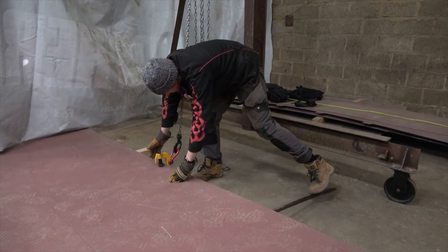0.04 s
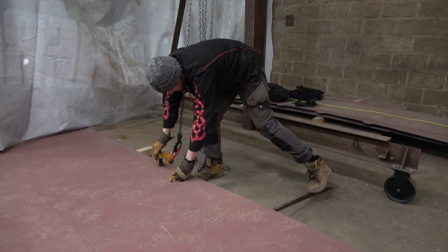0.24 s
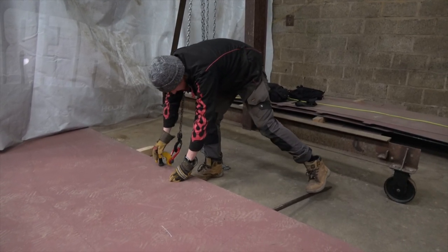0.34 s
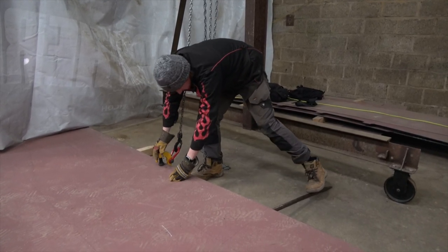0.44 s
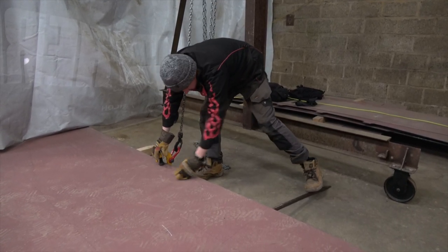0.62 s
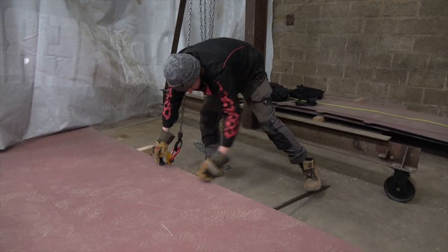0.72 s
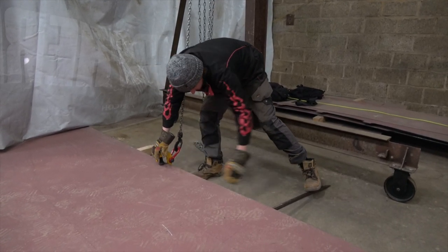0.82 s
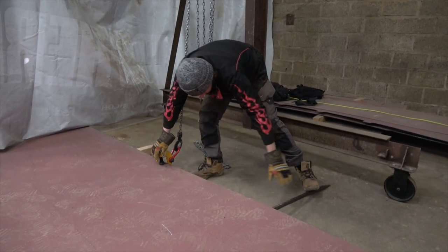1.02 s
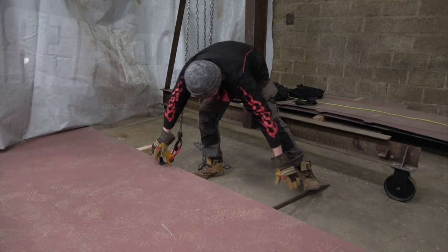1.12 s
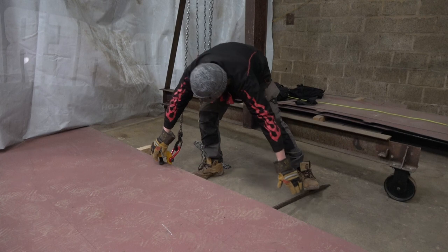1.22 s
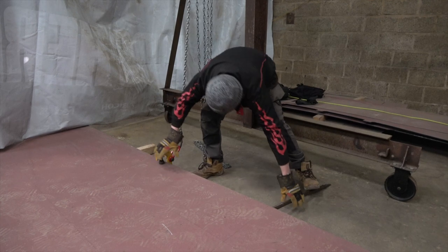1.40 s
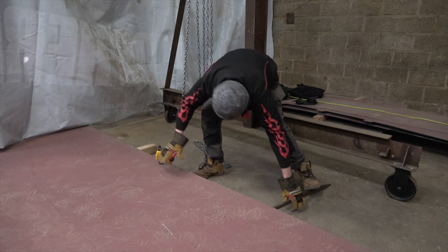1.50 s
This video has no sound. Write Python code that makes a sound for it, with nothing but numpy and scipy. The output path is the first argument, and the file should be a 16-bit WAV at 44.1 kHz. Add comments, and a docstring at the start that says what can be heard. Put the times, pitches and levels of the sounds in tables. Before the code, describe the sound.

A small steel piece, still ringing from a knock, slides briefly and clanks down on a big floor plate that booms underneath. A glove drags faintly and boots shuffle on gritty concrete in a reverberant workshop.

```python
"""A small steel piece, still ringing from a knock, slides, touches and clanks down on a big floor plate.
Each contact rings its main modes and stirs dense, short-lived ones; the plate booms under it.
Then a glove drags off the plate and boots shuffle and step on gritty concrete, with a few light taps.
A block-walled workshop reverberates, over quiet air noise."""
import sys
import numpy as np
from scipy import signal
from scipy.fft import rfft, irfft, next_fast_len
from scipy.io import wavfile
from scipy.ndimage import uniform_filter1d

SR = 44100
rng = np.random.default_rng(int(sys.argv[2]) if len(sys.argv) > 2 else 0)


def master(y):
    """Save y as 16-bit WAV."""
    cut = np.clip(np.atleast_2d(y).T, -1, 1)
    pcm = np.round(cut * 32767)  # scale
    wavfile.write(sys.argv[1], SR, pcm.astype(np.int16))


N = 68355
LEAD_S = .1

# Spectra. Each row: frequency in Hz, relative density in dB.
AIR_SPECTRUM = [(25, 6), (45, 1.5), (80, -4.5), (200, -6), (400, -7), (750, -10), (1300, -14.5),
                (2200, -18), (3400, -10), (4500, -22), (15500, -25)]
SOLE_SPECTRUM = [(50, -25.5), (110, -5), (200, 0.5), (450, -1), (900, -3.5), (2200, -4.5), (4500, -10),
                 (9000, -12.5), (15500, -17.5)]
GLOVE_SPECTRUM = [(200, -20.5), (600, -14.5), (1100, -5.5), (2000, -2), (2900, 6), (4200, -9),
                  (10000, -32.5)]
PLATE_SPECTRUM = [(40, -46), (75, -24), (112, 0), (200, 2.5), (330, -1.5), (450, -10), (560, -15.5),
                  (640, -5), (760, -14), (1000, -19.5), (2000, -42)]
SLIDE_SPECTRUM = [(100, -40), (500, -18), (1200, -18), (1800, -11.5), (2300, -0.5), (2550, -7), (2800, -4),
                  (3900, -2.5), (4500, -13.5), (5400, 3), (6400, -16.5), (7700, -16), (8800, -33),
                  (15000, -43)]
KNOCK_SPECTRUM = [(300, -22), (650, -15.5), (1150, -29.5), (1650, -17.5), (2450, -14.5), (2780, 3.5),
                  (3200, -6.5), (3850, -1), (4150, -10.5), (5300, -10.5), (6000, -26.5), (7000, -25.5),
                  (7550, -11.5), (9200, -36), (10200, -31.5), (15000, -49)]
DENSE_MODE_SPECTRUM = [(60, -38), (150, -20), (400, -22), (650, -15), (1080, -21), (1450, -14.5),
                       (2000, -11), (2550, -7.5), (2800, -3), (3500, 2), (3950, 4.5), (4150, -14),
                       (5500, -8), (6500, -17), (7600, -15.5), (8800, -29.5), (9900, -11), (11000, -28.5),
                       (12700, -29), (13800, -21.5), (15300, -53)]
# Workshop decay. Each row: frequency in Hz, T60 in seconds.
HALL_DECAY = [(100, 0.78), (300, 0.88), (1000, 1), (2500, 0.84), (3700, 0.9), (5500, .62), (9000, .44),
              (15000, 0.47)]
# Sole scuffs. Each row: centre in seconds, length in seconds, level in dB, treble tilt in dB per octave.
SOLE_SCUFFS = [(0.645, 0.081, -64.5, -1), (0.732, 0.17, -65, -1.5), (0.784, 0.075, -59, -14),
               (.865, 0.052, -66, -0.5), (1.129, .1, -75, -2.5), (1.26, 0.065, -72, -3),
               (1.46, .05, -74, 0), (1.54, .07, -68.5, -0.5)]
# Grit clicks and light taps. Each row: start in seconds, level in dB, centre in Hz.
GRIT_TICKS = [(.52, -59.5, 10000), (.651, -54.5, 8530), (.664, -54, 8980), (.68, -58, 6970),
              (.729, -60.5, 9930), (.74, -57, 9996), (.776, -46.5, 2000), (0.819, -46.5, 1924),
              (.8555, -48, 2612), (0.858, -50, 3026), (1.25, -61.5, 850), (1.331, -62.5, 10900),
              (1.339, -68, 10000), (1.449, -66, 9000)]
# Plate and boot thuds. Each row: start in seconds, level in dB, centre in Hz, rise and T60 in seconds.
DULL_THUDS = [(-.005, -32.5, 209.3, 0.015, 0.19), (.0, -39.5, 303, 0.0091, 0.53),
              (0.048, -34.5, 309, 0.005, 0.17), (0.104, -34.5, 300, 0.0079, 0.11),
              (0.143, -30, 160.3, 0.027, 0.18), (.212, -36, 230, 0.0048, 0.3), (.234, -44, 626, .004, 0.11),
              (.24, -38, 316, 0.0066, 0.25), (.262, -36.5, 122.7, .012, 0.18),
              (0.383, -55, 196, 0.015, 0.28), (.73, -58.5, 269.6, 0.013, 0.29),
              (0.739, -59, 150, 0.014, .15), (.778, -46, 274.3, 0.016, 0.22), (.805, -54, 125, 0.034, 0.34),
              (1.427, -62, 278, .02, 0.25), (1.471, -56.5, 125, .02, 0.24)]
# Knocks on the plate. Each row: start in seconds, level in dB.
PLATE_KNOCKS = [(-.02, -39), (.229, -36)]
# Scrape envelope. Each row: time in seconds, level in dB.
SLIDE_LEVELS = [(.14, -72.5), (.152, -50.5), (.166, -41), (.18, -41.5), (.192, -38.5), (.205, -39),
                (.226, -28), (.235, -68.5)]
# Main modes. Each row: frequency in Hz, level in dB, T60 in seconds, change on a corner touch in dB.
STEEL_MODES = [(2167, -12.5, .09, -9), (2390, -17, .1, -3.5), (2810, -1, 0.12, 5.5), (2820, -20, .5, -3.5),
               (2880, -12.5, .2, -4.5), (3189, -4.5, .08, -5.5), (3438, 4.5, 0.093, -9),
               (3766, -8.5, 0.29, -9.5), (3885, -6.5, 0.45, -6), (5027, -12.5, .12, -3),
               (5310, -12.5, 0.073, -1), (6020, -9.5, .05, -3.5), (7720, -26.5, 0.099, 12),
               (9732, -11, 0.055, 2.5), (9935, -21, 0.046, -3.5), (14000, -20.5, .035, 1)]
# Steel on plate. Each row: start in seconds, ring in dB, crack in dB, corner share from 0 to 1.
STEEL_CONTACTS = [(.2059, -29, -24.5, 1), (.2104, -25, -23.5, 0.97), (.2276, -27.5, -10.5, 0),
                  (.2296, -23, -14.5, 0.11), (0.2322, -27.5, -10.5, 0), (0.235, -25.5, -8.5, 0),
                  (0.24, -32.5, -14.5, 0), (.2425, -29.5, -14, 0.02), (0.2666, -38.5, -25, 0.04),
                  (0.2997, -38, -24, 0.01), (0.3744, -60, -36, 0.04)]


def amp(db):
    """Decibels to gain."""
    return 10 ** (np.asarray(db) / 20)


def unit_rms(x):
    """Scale to rms 1."""
    return x / np.sqrt(np.mean(x ** 2) + 1e-20)


def clock_s():
    """Sample times, from LEAD_S before zero."""
    return np.arange(-round(LEAD_S * SR), N) / SR


def curve_at(points, hz):
    """Interpolate (Hz, value) points on a log frequency axis."""
    knots_hz, values = np.transpose(points)
    return np.interp(np.log(hz + 1), np.log(knots_hz + 1), values)


def filtered(x, response):
    """Zero-phase filter with gain response(hz)."""
    size = next_fast_len(len(x) + 8192)
    return irfft(rfft(x, size) * response(np.fft.rfftfreq(size, 1 / SR)), size)[:len(x)]


def resonate(x, spectrum):
    """Drive a minimum-phase body of unit energy."""
    size = 2 * next_fast_len(len(x))
    gain = unit_rms(amp(curve_at(spectrum, np.fft.rfftfreq(size, 1 / SR))))
    cepstrum = irfft(np.log(gain), size)
    causal = np.concatenate([cepstrum[:1], 2 * cepstrum[1:size // 2]])
    return irfft(rfft(x, size) * np.exp(rfft(causal, size)), size)[:len(x)]


def noise(spectrum):
    """Coloured noise, rms 1."""
    white = rng.standard_normal(len(clock_s()))
    return unit_rms(filtered(white, lambda hz: amp(curve_at(spectrum, hz))))


def band(centre_hz, half_width_oct):
    """Band noise, rms 1."""
    white = rng.standard_normal(len(clock_s()))
    return unit_rms(filtered(white, lambda hz: 1 / (1 + (np.log2((hz+1) / centre_hz) / half_width_oct)**4)))


def friction(spectrum, spread_db, tilt_db_oct=0):
    """Tiny slips of uneven size, coloured, rms 1."""
    slips = rng.standard_normal(len(clock_s()))
    roughness = unit_rms(uniform_filter1d(rng.standard_normal(len(slips)), size=40))
    slips *= amp(spread_db * roughness)
    rub = filtered(slips, lambda hz: amp(curve_at(spectrum, hz) + tilt_db_oct * np.log2(1 + hz / 500)))
    return unit_rms(rub)


def blow(start_s, t60_s, rise_s=0.00044):
    """Envelope: quick rise, exponential decay."""
    age_s = np.maximum(clock_s() - start_s, 0)
    return (1 - np.exp(-age_s / rise_s)) * amp(-60 * age_s / t60_s)


def swell(centre_s, length_s):
    """Envelope: Gaussian rise and fall."""
    return np.exp(-2 * ((clock_s() - centre_s) / length_s) ** 2)


def air():
    """Quiet, steady room noise."""
    return amp(-69.5) * noise(AIR_SPECTRUM)


def hall(x, rise_s=0.002):
    """Workshop reverberation: each frequency dies at its own rate."""
    hz, age_s, bins = signal.stft(rng.standard_normal(SR + SR // 2), SR, nperseg=256)
    decay = amp(-60 * age_s / curve_at(HALL_DECAY, hz)[:, None])
    tail = signal.istft(bins * decay, SR, nperseg=256)[1]
    tail *= 1 - np.exp(-np.arange(len(tail)) / SR / rise_s)
    return signal.fftconvolve(x, tail / np.linalg.norm(tail))[:len(x)]


def ticks():
    """Single grains and small things click."""
    return sum(amp(db) * band(hz, half_width_oct=.75) * blow(start_s, t60_s=.018)
               for start_s, db, hz in GRIT_TICKS)


def scuffs():
    """Soles rub over grit."""
    return sum(amp(db) * swell(centre_s, length_s) * friction(SOLE_SPECTRUM, 3.1, tilt_db_oct)
               for centre_s, length_s, db, tilt_db_oct in SOLE_SCUFFS)


def glove():
    """A glove drags off the plate."""
    return amp(-58.5) * swell(centre_s=.69, length_s=0.2) * friction(GLOVE_SPECTRUM, spread_db=1.5)


def thuds():
    """Soft blows of plate and boots each stir a low mode and its neighbours."""
    out = 0
    for start_s, db, hz, rise_s, t60_s in DULL_THUDS:
        mode = np.sqrt(2) * np.sin(2 * np.pi * hz * (clock_s() - start_s))
        neighbours = amp(-3) * band(hz, half_width_oct=0.48)
        out += amp(db) * (mode + neighbours) * blow(start_s, t60_s, rise_s)
    return out


def plate_boom():
    """The floor plate booms under each knock."""
    return sum(amp(db) * noise(PLATE_SPECTRUM) * blow(start_s, t60_s=.55, rise_s=.005)
               for start_s, db in PLATE_KNOCKS)


def knock_ring():
    """The piece's fading ring from a knock just before zero."""
    return amp(-29.5) * noise(KNOCK_SPECTRUM) * blow(start_s=-0.024, t60_s=0.26)


def slide():
    """The piece scrapes over the plate and squeaks just before it drops."""
    times_s, levels_db = np.transpose(SLIDE_LEVELS)
    envelope = amp(np.interp(clock_s(), times_s, levels_db, left=-120, right=-120))
    scrape = envelope * friction(SLIDE_SPECTRUM, spread_db=1.0)
    squeak = amp(-53.5) * swell(centre_s=0.17, length_s=.022) * band(9965, half_width_oct=0.022)
    return scrape + squeak


def clank():
    """Each contact rings the main modes anew; its crack and clatter stir the dense ones."""
    time_s = clock_s()
    ring, force = np.zeros((2, len(time_s)))
    for start_s, ring_db, crack_db, corner_share in STEEL_CONTACTS:
        crack = blow(start_s, t60_s=.009)
        clatter = amp(-17.5) * blow(start_s, t60_s=0.27)
        force += amp(crack_db) * rng.standard_normal(len(time_s)) * (crack + clatter)
        live = (time_s > start_s) & (time_s < start_s + 1)
        age_s = time_s[live] - start_s
        for hz, mode_db, t60_s, corner_db in STEEL_MODES:
            onset_db = ring_db + mode_db + corner_share * corner_db + rng.normal(0, 1)
            polarity = rng.choice([-1, 1])
            ring[live] += polarity * amp(onset_db - 60 * age_s / t60_s) * np.sin(2 * np.pi * hz * age_s)
    return ring + resonate(force, DENSE_MODE_SPECTRUM)


def scene():
    """Steel, low blows and shuffles in the hall, over its air; mono."""
    steel = clank() + knock_ring() + slide()
    lows = plate_boom() + thuds()
    shuffles = glove() + scuffs() + ticks()
    reverb = hall(amp(-7) * steel + amp(-8) * lows + amp(-5) * shuffles)
    return (steel + lows + shuffles + reverb + air())[None, -N:]


def record(dry):
    """The microphone thins the deep bass and passes nothing above its band limit."""
    low_cut_hz, top_hz = 85, 15750
    return filtered(dry[0], lambda hz: (hz < top_hz) * hz ** 2 / np.sqrt(hz ** 4 + low_cut_hz ** 4))[None]


dry = scene()
out = record(dry)
master(out)
```